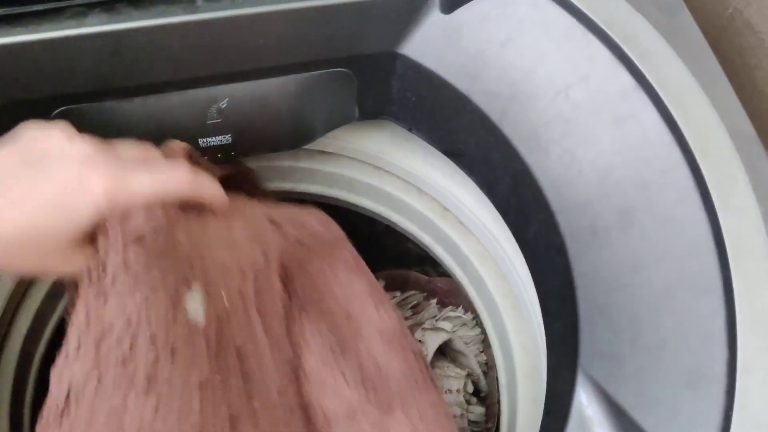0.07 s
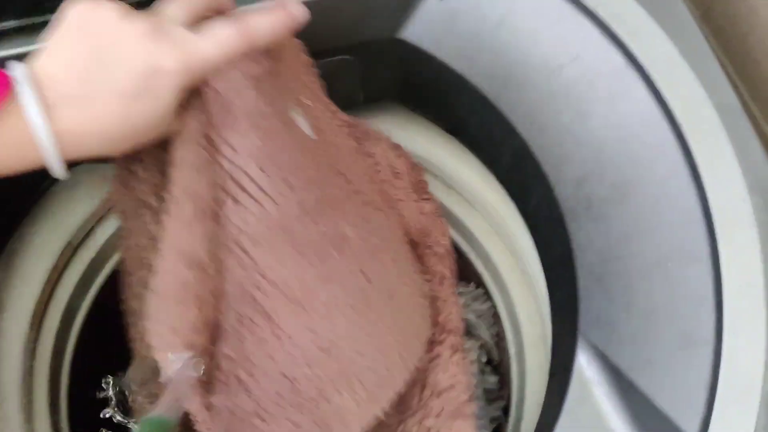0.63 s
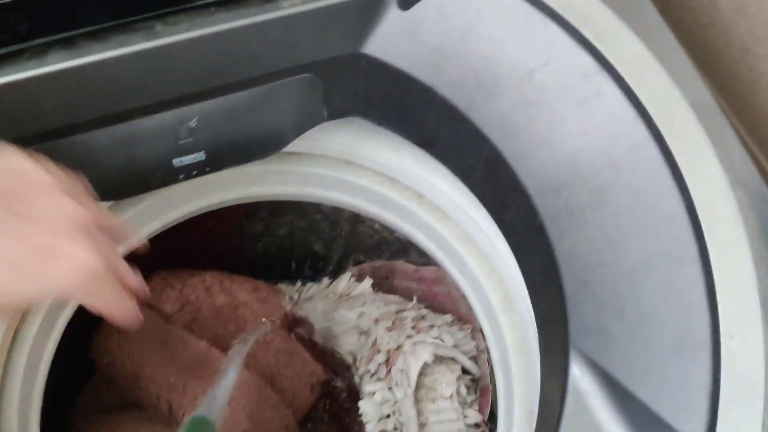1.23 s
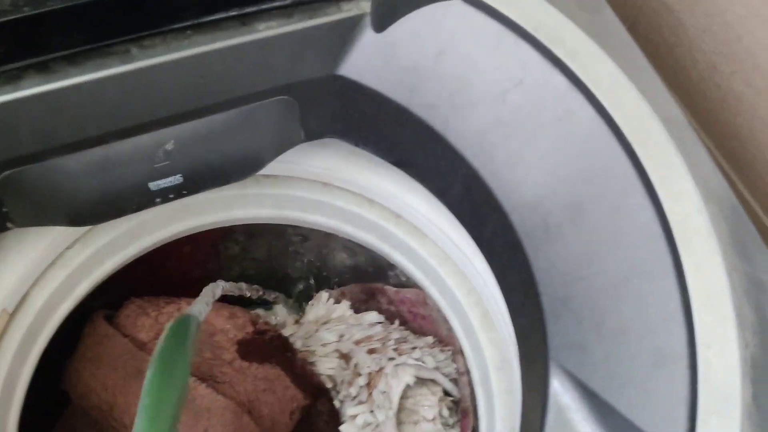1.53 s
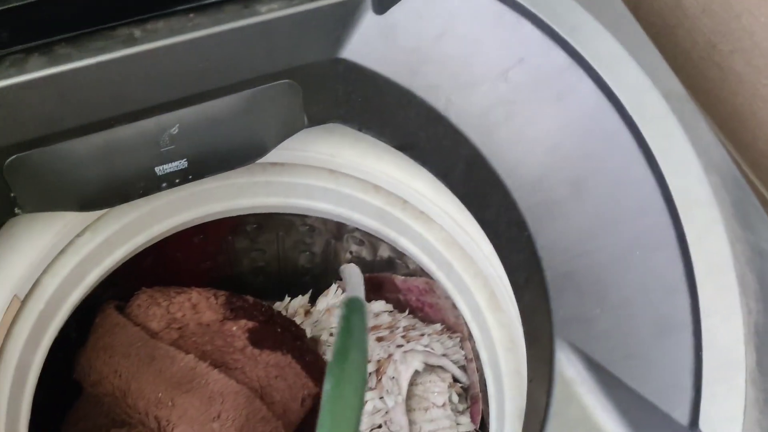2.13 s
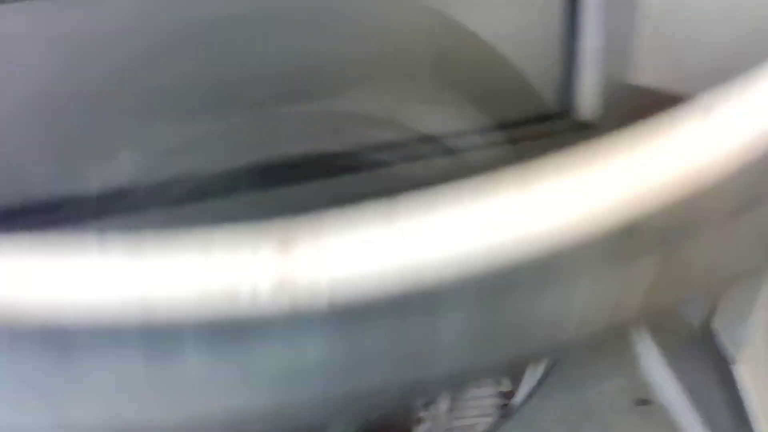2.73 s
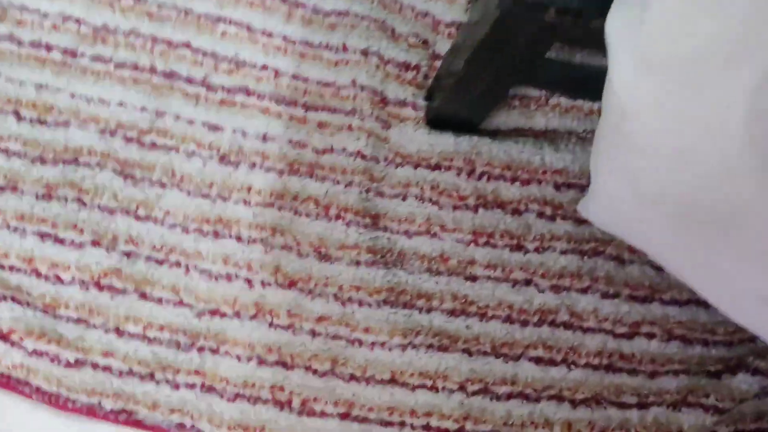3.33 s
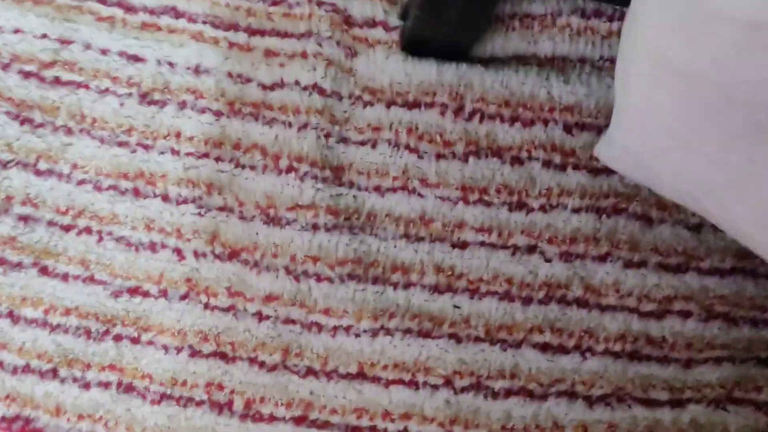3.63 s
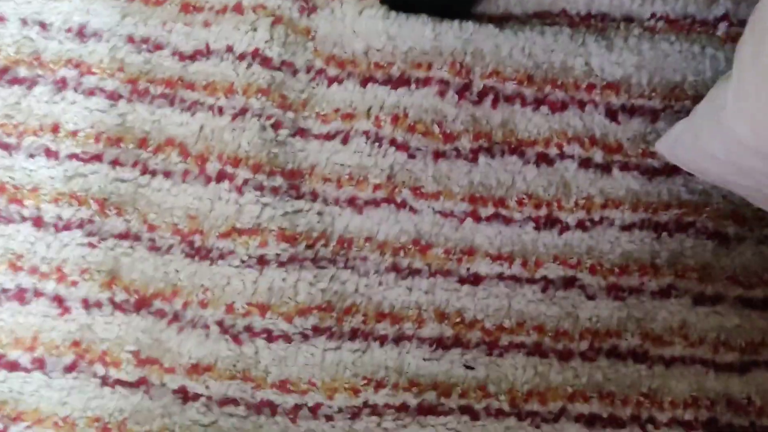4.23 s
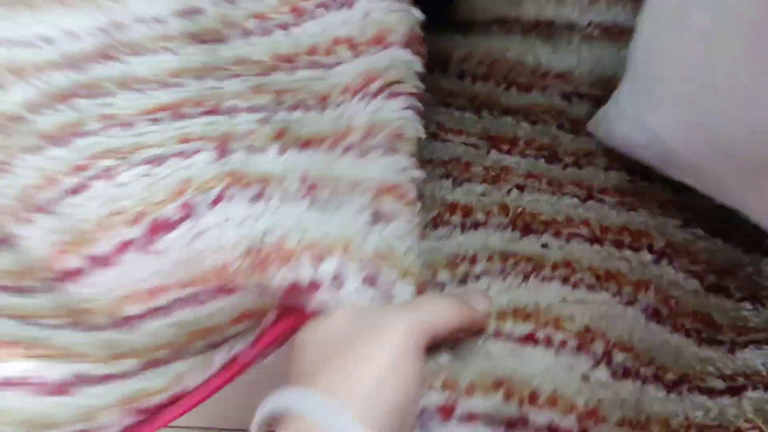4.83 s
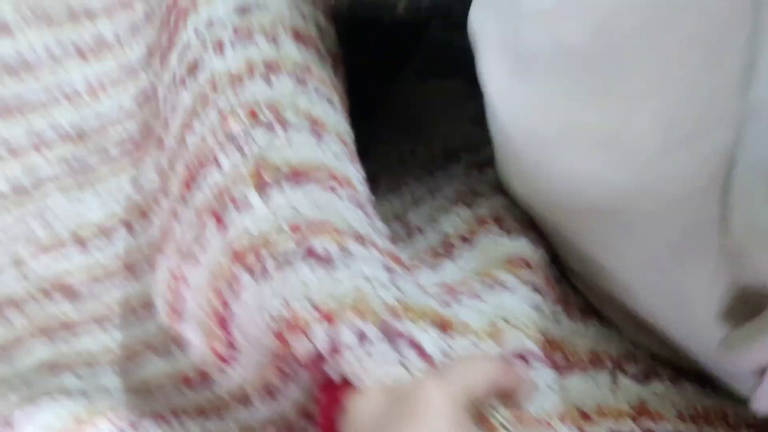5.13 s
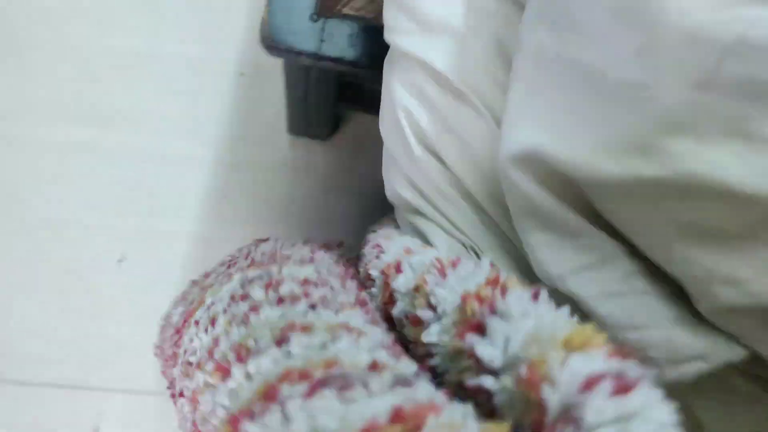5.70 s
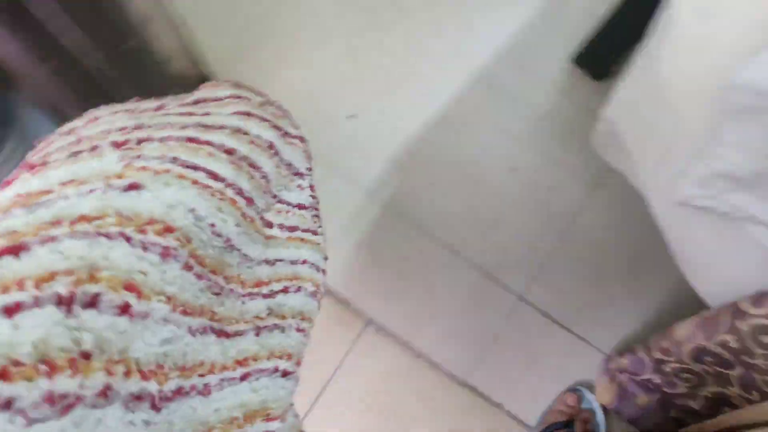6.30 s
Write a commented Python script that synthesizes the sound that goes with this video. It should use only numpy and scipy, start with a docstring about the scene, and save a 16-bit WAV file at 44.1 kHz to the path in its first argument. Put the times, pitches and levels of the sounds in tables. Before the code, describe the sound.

A hose spatters on wet laundry in a washer until a sharp click; then distant water hisses and a folded rug thumps down.

```python
"""Filling a washer, then folding a rug

A hose fills a top-loading washing machine as a wet towel is dropped in. The jet spatters on cloth,
then on the drum wall: its drops ring tiny bubbles, and the wet load sloshes and thuds. The lid is
grabbed with a knock and a click, and the sound breaks off. It fades back in a room away, where the
water is a faint hiss and a rug is folded and flopped on the tiles with a puff of air and a slap."""
import sys
import numpy as np
from scipy import signal
from scipy.fft import rfft, irfft, next_fast_len
from scipy.io import wavfile

SR = 44100
rng = np.random.default_rng(int(sys.argv[2]) if len(sys.argv) > 2 else 0)


def wav_out(sig):
    """Save sig, one row per channel (or a flat mono array), as 16-bit PCM at SR to the path in sys.argv[1]."""
    wavfile.write(sys.argv[1], SR, np.round(np.clip(np.atleast_2d(sig).T, -1, 1) * 32767).astype(np.int16))


N = 280507
T = np.arange(N) / SR
BREAK_S = 3.056   # the machine breaks off and the next room follows

# Levels in the tables are relative: the function that plays a table may add a gain of its own.
# how alike the left and right sides are: f/Hz, correlation
STEREO_LIKENESS = [(50, 0.93), (140, 0.99), (260, 0.82), (520, 0.66), (1000, 0.043), (4000, 0), (15000, 0)]
# the left side is duller in the treble: f/Hz, left minus right/dB
SIDE_BALANCE = [(900, 0), (2000, -2), (2900, -3.5), (3500, -11), (4050, -10), (5000, -7.5), (6000, -0.5),
                (6700, -5.5), (8000, 0)]
# both sides lose the highest treble: f/Hz, level/dB
TREBLE_LOSS = [(6300, 0), (6800, -10), (7200, -13.5), (7600, -22), (8600, -20.5), (15000, -21)]

# tone of the water heard a room away: f/Hz, level/dB
FAR_WATER_TONE = [(100, -23), (170, -12.5), (200, 0.5), (250, -3), (350, -6), (395, -3), (440, -8),
                  (620, -8.5), (730, -14.5), (950, -10), (2000, -13), (4000, -15.5), (5300, -14),
                  (6500, -23), (9000, -21), (15000, -22.5)]
# tone of the home's rumble: f/Hz, level/dB
HOME_TONE = [(11, -30), (18, 2), (33, -1.5), (54, -5.5), (86, -6.5), (141, -17.5), (170, -26.5), (220, -39),
             (370, -120)]
# faint high spatters of the far water: t/s, hold/s, level/dB
FAR_SPATTERS = [(3.32, .1, -59), (3.409, .008, -45.5), (4.203, .01, -53), (4.695, .018, -45)]
# tone of those spatters: f/Hz, level/dB
FAR_SPATTER_TONE = [(1500, -35), (3500, -13.5), (4500, 4), (5500, -5), (7000, -17), (15000, -18)]
# small hard ticks in the next room: t/s, level/dB
TICKS = [(5.2669, -37), (5.3988, -35), (6.019, -35)]
# tone of a hard contact: f/Hz, level/dB
CRACK_TONE = [(100, -5), (400, -17.5), (1200, -5.5), (3000, 2), (5000, 7), (6500, 10), (9000, 4),
              (15000, -7)]

# folds of the rug meet and trap air: t/s, level/dB, f/Hz, length/s
AIR_BUMPS = [(5.8, -36, 130, 0.015), (5.205, -37, 445, .014), (5.229, -39, 720, 0.013),
             (5.234, -31, 266, 0.029), (5.8, -39, 74, .04)]
# the rug swishes as it is folded: t/s, hold/s, level/dB
RUG_SWISHES = [(5.17, 0.053, -39.5), (5.215, 0.046, -40), (5.37, 0.031, -44), (5.975, 0.048, -46)]
# tone of the dragged rug: f/Hz, level/dB
DRAG_TONE = [(30, -31), (130, 2.5), (260, -5.5), (500, -17), (850, -20), (1500, -20), (3000, -29),
             (6000, -36), (15000, -50)]
# the rug lands in folds: t/s, level/dB, puff length/s
RUG_LANDINGS = [(5.6935, -14, 0.0044), (5.697, 1, 0.0047), (5.712, -35, 0.0087)]
# tone of its slap on the tiles: f/Hz, level/dB
SLAP_TONE = [(60, -1.5), (150, 3), (320, 0.5), (550, -13.5), (850, -10), (1300, -19), (3000, -23),
             (6000, -29), (15000, -34)]
# notes of the floor and stool under it: f/Hz, level/dB, t60/s (the time to die away by 60 dB)
FLOOR_NOTES = [(84, -9, 0.14), (122, -1, 0.16), (173, -6.5, 0.16), (272, -8, 0.1), (317.5, -12, .12),
               (786, -12.5, 0.078), (943, -13, 0.047), (1620, -14.5, 0.03), (1966, -22, 0.056),
               (2690, -20.5, 0.064)]

# notes of the washer's cabinet and lid: f/Hz, level/dB, t60/s
CABINET_NOTES = [(136.6, 1, 0.56), (233, -1.5, 0.43), (301, -7.5, 0.27), (381.5, -2, 0.23),
                 (470, -29.5, 0.5), (508, -15, 0.45), (613.7, -7, 0.79), (970, -11.5, 0.59),
                 (1370, -33.5, 5.0), (1567, -29.5, 0.17), (2180, -8, 0.21), (2330, -37, 1.3)]
# a low thump as the sound starts, then the wet load's thuds: t/s, level/dB, strongest f/Hz, longest t60/s
LOW_THUDS = [(0.005, -13, 220, 0.18), (0.1, -20, 403, .1), (0.114, -19, 140, 0.17),
             (0.135, -14.5, 243, 0.2), (0.204, -7.5, 162, 0.11), (0.212, -15, 240, 0.42),
             (0.978, -16, 374, .15), (1.004, -5.5, 132, 0.25), (1.024, -18, 170, .12),
             (1.066, -17, 120, .1), (1.496, -13, 330, .2), (1.536, -14, 235, 0.39)]
# the lid is grabbed, bounces and snaps: t/s, level/dB, top f/Hz, rattle t60/s, crack level/dB
LID_HITS = [(2.882, -1.5, 1300, .19, -16.5), (2.8862, -7, 700, .12, -30), (2.913, -12, 800, .18, -26.5),
            (3.039, -8, 1820, 0.054, 7.5)]
# tone of the lid's rattle: f/Hz, level/dB
RATTLE_TONE = [(40, -20.5), (130, -9.5), (380, -9.5), (700, -4), (1200, -15), (2500, -16.5), (6000, -22),
               (15000, -40)]
# notes of the air in the tub: f/Hz, width/Hz, level/dB
TUB_NOTES = [(85, 20, 3), (129, 43, 6.5), (229, 33, -2.5), (289.3, 23, -4)]
# tone of the filling tub's rumble: f/Hz, level/dB
TUB_RUMBLE_TONE = [(8, -12.5), (20, -4.5), (30, -1.5), (45, -9), (65, -15), (110, -14), (250, -31.5)]
# the tub's low drumming and rumble, dipping during the loudest gush: t/s, level/dB
DRUMMING_CURVE = [(0, -26), (0.6, -28.5), (1.5, -28), (1.72, -33.5), (2.2, -31), (3.0, -28)]

# the load shifts or the jet digs into pooled water: t/s, hold/s, gurgle/dB, plunge/dB, plunge f/Hz
SLOSH_SURGES = [(0.0, .015, -34, -24.5, 750), (0.092, 0.061, -35, -49, 700), (0.19, 0.056, -36, -39, 700),
                (0.27, 0.047, -32, -27.5, 1050), (0.347, 0.063, -31, -29, 950),
                (0.608, 0.033, -40, -28, 950), (0.832, .025, -48, -27.5, 1150),
                (0.961, .025, -30, -28, 1100), (1.484, 0.047, -25, -22.5, 1000),
                (1.622, .06, -40, -30, 1300), (1.69, .05, -53, -21.5, 1350),
                (1.815, 0.077, -46.5, -31.5, 1250), (2.542, 0.072, -32, -40, 1200),
                (2.691, 0.043, -34, -34.5, 1200)]
# tone of the big bubbles in the load: f/Hz, level/dB
GURGLE_TONE = [(150, -10.5), (250, -2.5), (390, -2), (500, -0.5), (610, -2), (850, -6.5), (1400, -21.5)]
# tone of the jet plunging into water: f/Hz, level/dB
PLUNGE_TONE = [(400, -26), (850, 1), (1300, -3.5), (1900, -4), (2600, -5), (4500, -13)]
# tone of the spattering drops: f/Hz, level/dB
SPATTER_TONE = [(1500, -14), (2300, -5.5), (3000, -2), (3800, -0.5), (4600, -3), (6000, -8)]
# tone of the fine spray: f/Hz, level/dB
SPRAY_TONE = [(3000, -16), (4000, -6), (5000, -6), (5900, -1), (6700, 2.5), (7800, -5), (11000, -5.5),
              (15000, -14.5)]
# the finest droplets sizzle as the jet glances off: t/s, hold/s, level/dB
SIZZLE_SPURTS = [(0.905, 0.031, -25.5), (1.251, .02, -25.5), (1.397, 0.14, -27.5), (1.603, 0.22, -33.5),
                 (1.825, .01, -22), (1.999, 0.07, -27), (2.18, 0.078, -28.5), (2.366, 0.036, -23),
                 (2.558, 0.023, -18), (2.60, 0.073, -22.5)]
# the fattest drops burst: t/s, level/dB, f/Hz, left minus right/dB, ring/cycles, droplet scatter/s
FAT_DROPS = [(0.6913, -7.5, 4500, -9, 22, 0.0019), (0.6936, -4, 5000, -16, 36, .002),
             (0.9058, -9, 5700, 0, 14.4, .001), (0.920, -8.5, 4600, 2, 12, .001),
             (0.9295, -8, 4640, -4, 20, 0.00096), (0.9322, -3.5, 3950, -4, 36, .002),
             (1.327, -14, 5140, 0, 16, 0.00096), (1.5968, 0, 5910, -1, 12, 0.00056),
             (1.6075, -0.5, 5960, -5, 10, .0006), (1.614, -14.5, 3010, 2, 7, 0.0022),
             (1.626, -12, 2750, 3, 8.5, 0.0022), (1.632, -3, 5800, -6, 12.4, 0.0027),
             (1.637, -8, 2690, 6, 8, .002), (1.669, -3, 5600, -1, 10, 0.0032),
             (1.684, -2, 6000, -3, 7.7, .001), (1.6899, -2.5, 5020, 1, 9, .0012),
             (1.6975, -6, 5500, 1, 8, .0008), (1.7035, -4, 5200, 0.5, 8.7, .0008),
             (1.711, -15, 1330, -2, 8, .002), (1.7128, -6.5, 4300, -1, 8, .0015),
             (1.723, -17, 1408, 2, 8, .003), (1.7322, -7.5, 4000, 1.5, 8, 0.0024),
             (1.7398, -1.5, 5450, -2.5, 13, 0.0005), (1.7445, -7, 5200, -1, 10, 0.0007),
             (1.7473, -5.5, 5800, -6.5, 11, .0006), (1.7538, -4, 5800, -4.5, 11.5, .001),
             (1.7675, -6, 5500, 3, 10, .001), (1.7735, -13, 4520, 0.5, 8, .001),
             (1.834, -12.5, 1300, 0, 5.5, .002), (1.8345, -3, 3400, 0, 10, .002),
             (1.842, -10.5, 3300, 4, 13, .007), (1.875, -16.5, 1200, 5, 9, 0.0044),
             (1.876, -11, 3140, 7, 10, 0.0063), (1.993, -10, 4242, -5, 25, 0.0029),
             (2.039, -8.5, 5740, -2, 10, 0.00055), (2.171, -13, 4413, 0, 13, .001),
             (2.217, -15, 4000, 3, 10, 0.00095), (2.296, -5.5, 3700, -1, 20, 0.0033),
             (2.3269, -5, 6260, 4.5, 57, 0.0045), (2.391, -2.5, 4495, 1, 22, .002),
             (2.3937, -7, 6070, 3, 16, 0.0029), (2.4698, -6, 5900, 1, 21, 0.000986),
             (2.543, -8.5, 3890, -1, 20.3, .002), (2.556, -8.5, 4100, 2.5, 19.6, 0.0033),
             (2.58, -6, 4380, 6, 17, .002), (2.698, -4.5, 4200, 2.5, 16, 0.0037),
             (2.7138, -10, 4500, 1, 9.8, .003), (2.823, -13, 5520, 1, 12, 0.0031),
             (2.843, -7, 5200, 2.5, 10.6, .001), (2.9853, -16, 3930, 0, 18, 0.0018)]
# the steady jet swings from the load towards the drum wall: t/s, spatter/dB, spray/dB
JET_CURVE = [(0.1, -35, -42), (0.42, -31.5, -34), (0.55, -31, -37), (1.13, -32.5, -38), (1.35, -36, -32),
             (2.08, -31, -34), (2.35, -31.5, -28), (2.65, -26.5, -28), (2.85, -33.5, -35),
             (3.0, -32.5, -41)]
# the spatter's pitch follows the spot that the jet hits: t/s, f/Hz
SPATTER_PITCH_CURVE = [(0, 3800), (0.15, 3550), (0.28, 3850), (0.4, 3500), (0.57, 3980), (0.71, 4150),
                       (0.8, 3750), (1.05, 3650), (1.45, 3750), (1.63, 3100), (1.72, 4300), (1.83, 3590),
                       (1.9, 3500), (2.0, 4150), (2.22, 4450), (2.3, 3950), (2.6, 4200), (3.0, 4050)]
# the jet catches a fold or the wall and splashes: t/s, hold/s, spatter/dB, spray/dB
JET_SPLASHES = [(0.39, .05, -31, -42), (0.554, .035, -27, -38.5), (0.676, .035, -25, -31),
                (0.895, .045, -33, -32), (1.025, .045, -29, -40), (1.371, .07, -24, -28.5),
                (1.474, .045, -32, -27), (1.608, .06, -23.5, -22), (1.675, .065, -23, -18.5),
                (1.828, .065, -21, -30), (1.991, .05, -38, -29.5), (2.12, .125, -28.5, -27),
                (2.314, .03, -36, -23), (2.379, .055, -39.5, -27.5), (2.52, .11, -25.5, -23),
                (2.683, .05, -22, -21.5)]


def from_db(db):
    """Turn decibels into a gain."""
    return 10 ** (np.asarray(db) / 20)


def rms_one(x):
    """Scale a sound to an average power of 1."""
    return x / np.sqrt(np.mean(x ** 2) + 1e-20)


def peak_one(x):
    """Scale a sound to a peak of 1."""
    return x / np.max(np.abs(x))


def in_time(rows):
    """One curve per column, straight between the rows."""
    times, *columns = np.transpose(rows)
    return [np.interp(T, times, column) for column in columns]


def at_hz(points, hz):
    """Read a table on a log-frequency axis."""
    f, value = np.transpose(points)
    return np.interp(np.log(hz + 1), np.log(f), value)


def panned(left_db):
    """Left and right gains that keep the total power the same."""
    gains = from_db(np.array([[.5], [-.5]]) * left_db)
    return gains / np.sqrt(np.mean(gains ** 2, axis=0))


def add(out, s, sound):
    """Mix a sound in from time s on."""
    start = round(s * SR)
    out[:, start:start + sound.shape[-1]] += sound[..., :N - start]


def drift(per_s):
    """A random wobble, typically of size 1."""
    return np.interp(T * per_s, np.arange(4000), rng.standard_normal(4000)) * np.sqrt(1.5)


def surging(steady_db, events, attack_s, t60):
    """Level curves in dB: on top of each steady level, events rise, hold and die away."""
    power = [from_db(db) ** 2 for db in steady_db]
    for s, hold, *levels in events:
        rise = np.clip((T - s) / attack_s, 0, 1)
        fall = from_db(-60 * np.clip((T - s - hold) / t60, 0, 2))
        power = [p + (rise * fall * from_db(db)) ** 2 for p, db in zip(power, levels)]
    return [10 * np.log10(p + 1e-18) for p in power]


def colour(x, tone):
    """Filter a sound to a tone table, with no ringing ahead of a hit (minimum phase)."""
    size = 2 * next_fast_len(x.shape[-1] // 2 + SR // 20)
    hz = np.arange(size // 2 + 1) * SR / size
    cepstrum = irfft(np.log(from_db(at_hz(tone, hz))))
    cepstrum[1:size // 2] *= 2
    cepstrum[size // 2 + 1:] = 0
    return irfft(rfft(x, size) * np.exp(rfft(cepstrum)))[..., :x.shape[-1]]


def diffuse(pair):
    """Blend two unrelated signals into stereo: alike in the bass, apart in the treble."""
    size = 2 * next_fast_len(pair.shape[-1] // 2 + 1)
    mid, side = rfft(pair, size)
    alike = np.clip(at_hz(STEREO_LIKENESS, np.arange(len(mid)) * SR / size), -1, 1)
    return irfft(np.sqrt(1 + alike) * mid + np.sqrt(1 - alike) * side * [[1], [-1]])[:, :pair.shape[-1]]


def noise(tone):
    """Steady stereo noise of power 1."""
    return rms_one(colour(diffuse(rng.standard_normal((2, N))), tone))


def burst(t60):
    """Dense echoes dying away, in stereo, with energy 1."""
    t = T[:SR // 2]
    dying_noise = rng.standard_normal((2, len(t))) * from_db(-60 * t / t60)
    return rms_one(diffuse(dying_noise)) / np.sqrt(len(t))


def echoing(x, t60, wet_db):
    """A sound plus the echoes of the space around it."""
    return x + from_db(wet_db) * signal.fftconvolve(x, burst(t60), axes=-1)[:, :x.shape[-1]]


def ring(taps, hz, t60):
    """Each tap starts a fading sine as tall as itself."""
    r, w = from_db(-60 / (t60 * SR)), 2 * np.pi * hz / SR
    return signal.lfilter([0, np.sin(w)], [1, -2 * r * np.cos(w), r * r], taps + 1e-18)


def resonating(pair, hz, width_hz, focus_db, block=128):
    """A sound plus its own ring in a resonance whose pitch moves."""
    out, r, state = pair.copy(), np.exp(-np.pi * width_hz / SR), np.zeros((2, 2))
    feed = np.array([1, 0, -1]) * (1 - r * r) / 2
    for i in range(0, round(BREAK_S * SR), block):
        feedback = [1, -2 * r * np.cos(2 * np.pi * hz[i] / SR), r * r]
        rung, state = signal.lfilter(feed, feedback, pair[:, i:i + block], zi=state)
        out[:, i:i + block] += from_db(focus_db) * rung
    return out


def wandering(pair, per_s=12, sway_s=.003):
    """Bubble pitches and their echoes shift by a few per cent as the jet moves over the load."""
    when = T + sway_s * drift(per_s)
    return np.array([np.interp(when, T, x) for x in pair])


def impacts(per_s, spread_db):
    """Drops land at random until the break, many small and a few large."""
    count = round(BREAK_S * SR)
    at = np.flatnonzero(rng.random(count) < np.broadcast_to(per_s, N)[:count] / SR)
    sizes = from_db(spread_db * np.minimum(rng.exponential(1, len(at)), 4))
    out = np.zeros(N)
    out[at] = sizes * rng.choice([-1, 1], len(at))
    return out


def bubbles(low_hz, high_hz, per_s, spread_db, cycles, sizes):
    """Each drop rings a bubble for some cycles; each size sits at its own place in the drum."""
    out, end = np.zeros((2, N)), round(BREAK_S * SR)
    for hz in np.geomspace(low_hz, high_hz, sizes):
        taps = impacts(per_s / sizes, spread_db)[:end]
        rings = rms_one(ring(taps, hz, cycles / hz)) * np.sqrt(hz)
        lag = rng.integers(-14, 15)
        out[:, :end] += np.array([rings, np.roll(rings, lag)]) * panned(rng.normal(0, 1.1))
    return out


def crack():
    """Hard things meet with a snap and a short clatter."""
    contact = burst(t60=0.012) + 0.7 * burst(t60=0.074)
    return peak_one(colour(contact, CRACK_TONE))


def next_room(fade_s=0.13, growth_db_per_s=3, grown_at_s=5.46):
    """Far water hisses over the rumble of the home; both fade in, then grow slowly."""
    fade_db = -39 * np.exp(-np.maximum(T - BREAK_S, 0) / fade_s)
    growth_db = -growth_db_per_s * np.maximum(grown_at_s - T, 0)
    hiss = noise(FAR_WATER_TONE) * from_db(-42 + 1.07 * drift(20))
    rumble = noise(HOME_TONE) * from_db(-43)
    return from_db(fade_db + growth_db) * (hiss + rumble)


def far_spatters():
    """The far water spatters briefly and faintly in one narrow, high band."""
    level_db, = surging([-np.inf], FAR_SPATTERS, attack_s=0.0064, t60=.1)
    return noise(FAR_SPATTER_TONE) * from_db(level_db)


def ticks():
    """Small hard things are touched in the next room."""
    out = np.zeros((2, N))
    for s, db in TICKS:
        add(out, s, from_db(db + 6) * crack())
    return out


def rug_bumps():
    """Each fold closes on a pocket of air, whose note swells and fades within a few cycles."""
    out = np.zeros((2, N))
    for s, db, hz, length in AIR_BUMPS:
        t = T[:int(length * SR)]
        add(out, s, from_db(db) * np.sin(np.pi * t / length) ** 2 * np.sin(2 * np.pi * hz * t))
    return echoing(out, t60=0.17, wet_db=-5)


def rug_drag(start_s=4.56, rise_s=.7):
    """The dragged rug rustles unevenly and swishes as it is folded."""
    level_db, = surging([-56.5], RUG_SWISHES, attack_s=0.02, t60=0.11)
    rise = np.clip((T - start_s) / rise_s, 0, 1)
    return noise(DRAG_TONE) * rise * from_db(level_db + 4.7 * drift(50))


def rug_flop(lowest_hz=65):
    """Each landing fold puffs out air, sets floor and stool ringing and slaps the tiles."""
    out, t = np.zeros((2, N)), T[:SR // 2]
    floor = sum(from_db(db - 60 * t / t60) * np.sin(2 * np.pi * hz * t) for hz, db, t60 in FLOOR_NOTES)
    for s, db, length in RUG_LANDINGS:
        puff = -np.sin(2 * np.pi * T[:int(length * SR)] / length)
        slap = peak_one(colour(burst(t60=0.19), SLAP_TONE))
        add(out, s, from_db(db - 14) * puff)
        add(out, s, -from_db(db - 11.5) * floor)
        add(out, s, from_db(db - 10) * slap)
    flop = signal.sosfilt(signal.butter(4, lowest_hz, "high", fs=SR, output="sos"), out)
    return echoing(flop, t60=.22, wet_db=-14)


def cabinet(contact_filter, longest_t60):
    """A blow rings the cabinet's notes, in a slightly new mix each time."""
    notes, t = 0, T[:SR // 2]
    for hz, db, t60 in CABINET_NOTES:
        fade = from_db(db + rng.normal(0, 2.5) - 60 * t / min(t60, longest_t60))
        notes += fade * rng.choice([-1, 1]) * np.sin(2 * np.pi * hz * t)
    return peak_one(signal.lfilter(*contact_filter, notes))


def thuds():
    """A low opening thump, then the wet load's thuds; each rings the cabinet mostly around one pitch."""
    out = np.zeros((2, N))
    for s, db, hz, t60 in LOW_THUDS:
        add(out, s, from_db(db - 4.5) * cabinet(signal.iirpeak(hz, 2.5, fs=SR), t60))
    return out


def lid(lowest_hz=210):
    """The loose lid rattles, knocks and cracks; it is too light to shake much bass from the cabinet."""
    out = np.zeros((2, N))
    for s, db, top_hz, t60, crack_db in LID_HITS:
        rattle = peak_one(colour(burst(t60), RATTLE_TONE))
        knock = cabinet(signal.butter(2, [lowest_hz, top_hz], "band", fs=SR), longest_t60=0.32)
        add(out, s, from_db(db) * (0.61 * knock + 0.75 * rattle + from_db(crack_db + 7) * crack()))
    return out


def slosh(level_db, drum_db):
    """Big bubbles crowd in the soaked load as it is stirred, over the rumble of the filling tub."""
    crowd = from_db(level_db - level_db.mean())
    gurgle = bubbles(206, 1200, per_s=1000 * crowd, spread_db=2.5, cycles=7.4, sizes=20)
    gurgle = rms_one(colour(wandering(echoing(gurgle, t60=0.22, wet_db=-4)), GURGLE_TONE))
    # half of the swell comes from the number of bubbles, half from their strength
    strength = from_db(.5 * (level_db + level_db.mean()))
    return gurgle * strength + noise(TUB_RUMBLE_TONE) * from_db(drum_db + 4)


def sizzle():
    """The tiniest bubbles tick at the very top of the treble, louder in spurts."""
    level_db, = surging([-44], SIZZLE_SPURTS, attack_s=0.0066, t60=.13)
    fizz = bubbles(7900, 14000, per_s=3000, spread_db=3, cycles=19, sizes=10)
    return rms_one(echoing(fizz, t60=.02, wet_db=-5.5)) * from_db(level_db)


def lesser_drops(spray_db, most_per_s=90, scatter_s=.0012):
    """Random rows like those of FAT_DROPS: a harder spray throws more and louder drops."""
    chance = most_per_s * from_db(spray_db - spray_db.max()) / SR
    at = np.flatnonzero((rng.random(N) < chance) & (T < BREAK_S))
    size, pitch, side, ringing = rng.uniform(-0.92, 1, (len(at), 4)).T
    db = spray_db[at] + 8.5 + 3.5 * size
    hz = np.interp(pitch, [-1, 1], [3410, 6340])
    left_db = 2 + 3.5 * side
    cycles = 42 * 2 ** ringing
    return list(zip(T[at], db, hz, left_db, cycles, np.full(len(at), scatter_s)))


def splats(spray_db, rise_per_s=4.9, droplets=12, droplet_cycles=7, pinch_off_s=.00025):
    """A fat drop traps a ringing bubble that rises in pitch, and scatters tiny ones in a wet slap."""
    out, t = np.zeros((2, N)), T[:SR // 24]
    for s, db, hz, left_db, cycles, scatter_s in FAT_DROPS + lesser_drops(spray_db):
        age = np.maximum(t - rng.integers(0, 3, (2, 1)) / SR, 0)   # each side has its own tiny delay
        cluster = np.sin(2 * np.pi * hz * age * (1 + rise_per_s * age)) * from_db(-60 * age * hz / cycles)
        for k in range(droplets):
            pitch = hz * np.exp(0.15 * rng.normal())
            droplet_age = np.maximum(age - k / droplets * rng.exponential(2 * scatter_s), 0)
            fade = from_db(-1 - 60 * droplet_age * pitch / droplet_cycles) / np.sqrt(2 + k)
            cluster += np.sin(2 * np.pi * pitch * droplet_age) * fade * rng.choice([-1, 1])
        cluster *= np.minimum(age / pinch_off_s, 1)
        bass_cut = signal.butter(2, .55 * hz, "high", fs=SR)   # small bubbles give off no bass
        splat = echoing(signal.lfilter(*bass_cut, cluster), t60=0.015, wet_db=-3)
        add(out, s, peak_one(splat) * from_db(db) * panned(left_db))
    return out


def jet_drumming(level_db):
    """Drops drum on the tub and set the air inside ringing."""
    taps = diffuse(np.array([impacts(900, spread_db=3.7), impacts(900, spread_db=4.3)]))
    notes = sum(from_db(db) * rms_one(ring(taps, hz, t60=np.log(1000) / np.pi / width))
                for hz, width, db in TUB_NOTES)
    return rms_one(notes) * from_db(level_db - 2.5)


def jet_plunge(level_db):
    """The jet digs a hollow in pooled water; coarse bubbles ring in it as its pitch moves."""
    hollow_hz, = in_time([(s + hold, hz) for s, hold, _, _, hz in SLOSH_SURGES])
    coarse = bubbles(620, 3200, per_s=1400, spread_db=2, cycles=7.4, sizes=16)
    coarse = colour(wandering(echoing(coarse, t60=0.048, wet_db=-1)), PLUNGE_TONE)
    return rms_one(resonating(coarse, hollow_hz, width_hz=470, focus_db=-0.5)) * from_db(level_db - 5.5)


def jet_spatter(spatter_db, spray_db):
    """The jet breaks into fine spray and spattering drops, which ring bubbles in the echoing drum."""
    spot_hz, = in_time(SPATTER_PITCH_CURVE)
    clumps = from_db(3 * drift(70))   # the stream arrives unevenly
    crowd = from_db(.6 * (spray_db - spray_db.mean()))   # a harder jet shares its energy among more drops
    fine = bubbles(3360, 12000, per_s=2800 * clumps * crowd, spread_db=3.5, cycles=13, sizes=18)
    fine = wandering(echoing(fine / np.sqrt(crowd), t60=0.031, wet_db=-1.5))
    spray = rms_one(colour(fine, SPRAY_TONE))
    drops = bubbles(1967, 5380, per_s=1400 * clumps * crowd, spread_db=3, cycles=22, sizes=24)
    drops = wandering(echoing(drops / np.sqrt(crowd), t60=0.057, wet_db=0))
    spatter = rms_one(resonating(colour(drops, SPATTER_TONE), spot_hz, width_hz=780, focus_db=4.5))
    return spray * from_db(spray_db + 1.5) + spatter * from_db(spatter_db - 3.5)


def scene():
    """Splashes and sloshes ride on the steady jet until the break; then the next room is heard."""
    spatter_db, spray_db = surging(in_time(JET_CURVE), JET_SPLASHES, attack_s=.018, t60=.16)
    gurgle_db, plunge_db = surging([-38, -36.5], SLOSH_SURGES, attack_s=.02, t60=.24)
    drum_db, = in_time(DRUMMING_CURVE)
    jet = jet_spatter(spatter_db, spray_db) + jet_plunge(plunge_db) + jet_drumming(drum_db)
    machine = jet + slosh(gurgle_db, drum_db) + thuds() + lid() + splats(spray_db) + sizzle()
    room = next_room() + ticks() + far_spatters() + rug_flop() + rug_drag() + rug_bumps()
    return np.where(T < BREAK_S, machine, room)


def record(dry):
    """Each side gets its own tone, the high treble is turned down, peaks clip and the very top is cut."""
    hz = np.geomspace(100, SR / 2, 400)
    sides_db = 20 * np.log10(panned(at_hz(SIDE_BALANCE, hz))) + at_hz(sorted(TREBLE_LOSS), hz)
    heard = np.array([colour(x, np.c_[hz, db]) for x, db in zip(dry, sides_db)])
    top_cut = signal.ellip(10, .2, 70, 15400, fs=SR, output="sos")
    return signal.sosfilt(top_cut, np.clip(heard, -1, 1))


dry = scene()
out = record(dry)
wav_out(out)
```